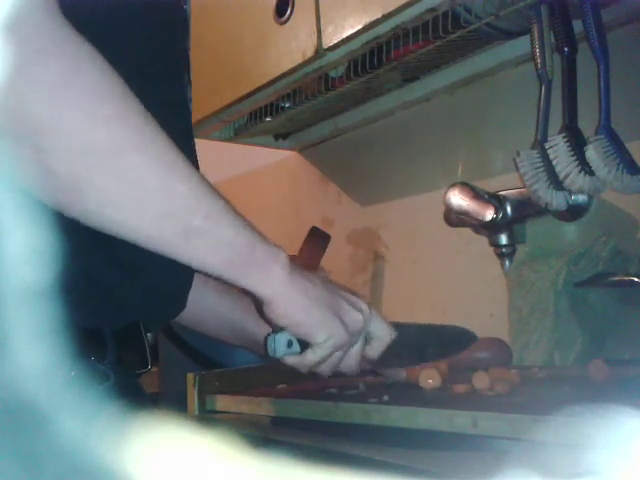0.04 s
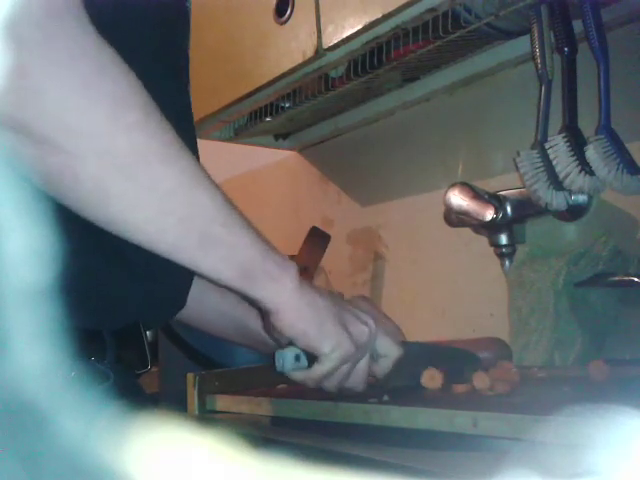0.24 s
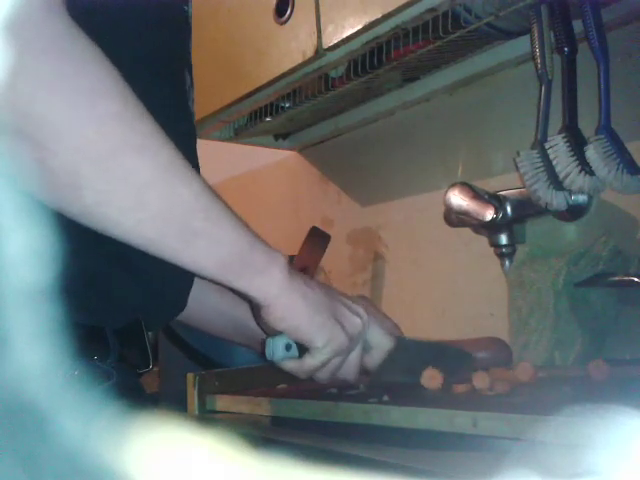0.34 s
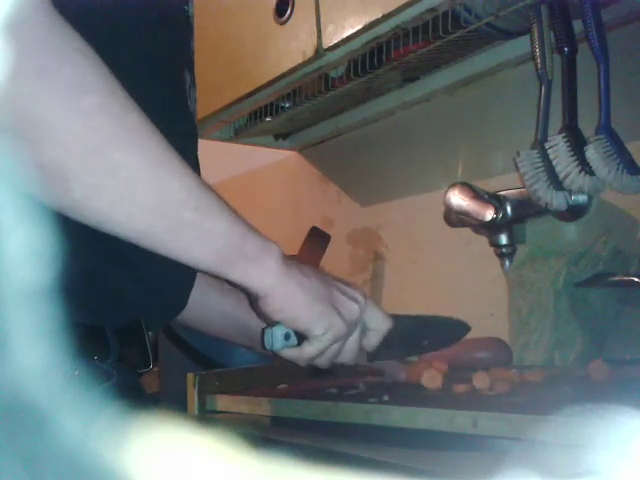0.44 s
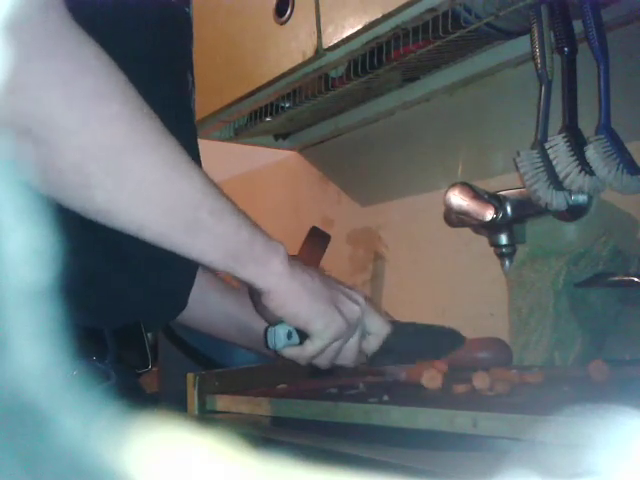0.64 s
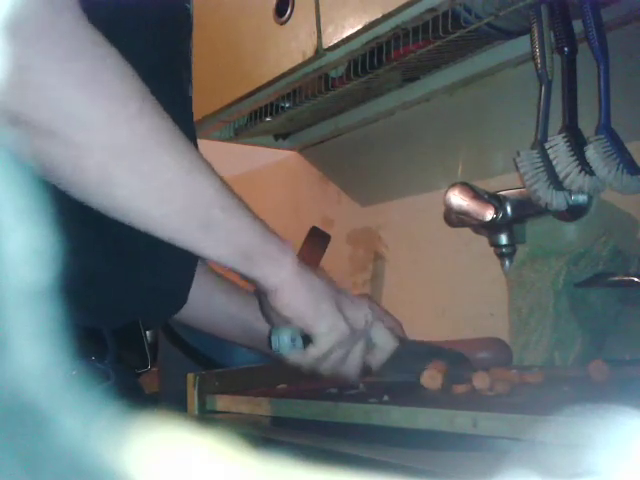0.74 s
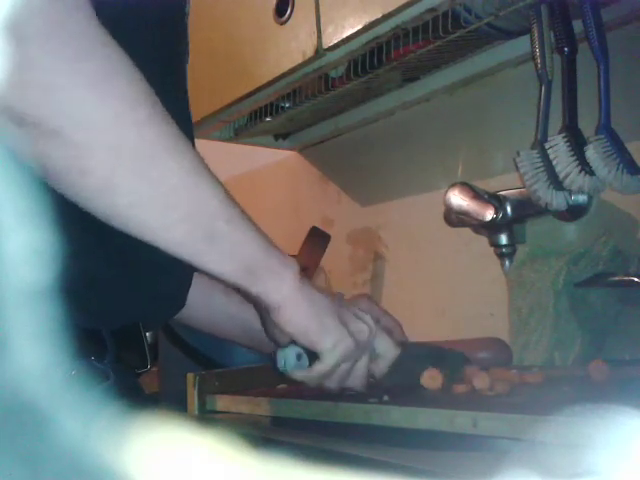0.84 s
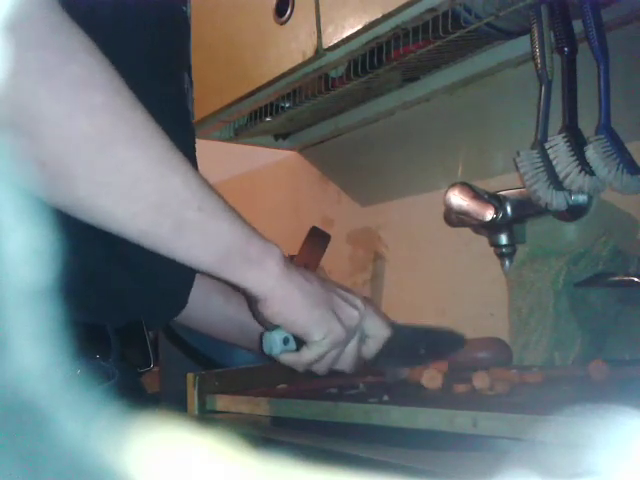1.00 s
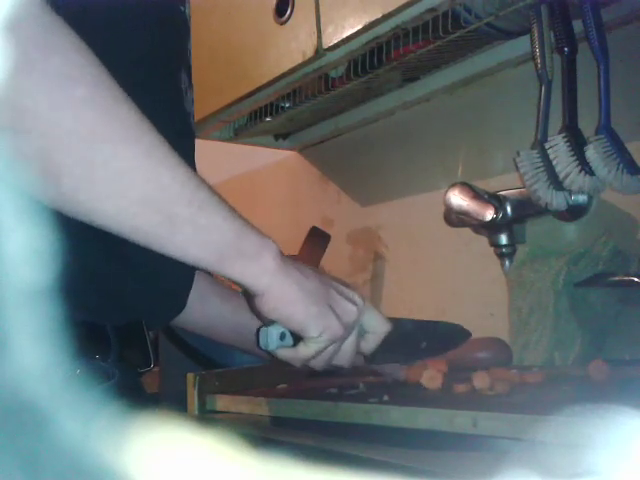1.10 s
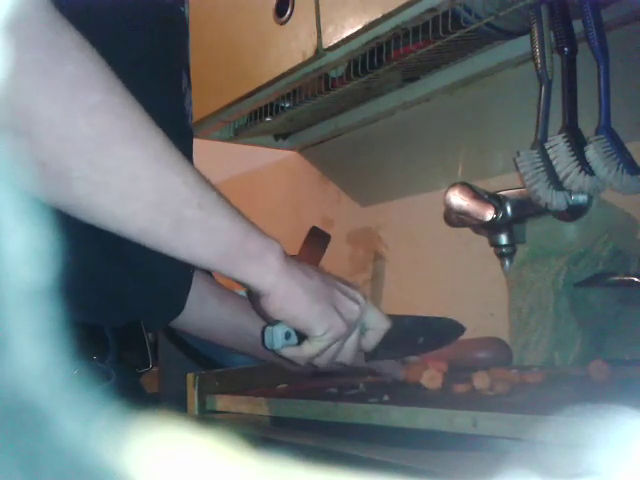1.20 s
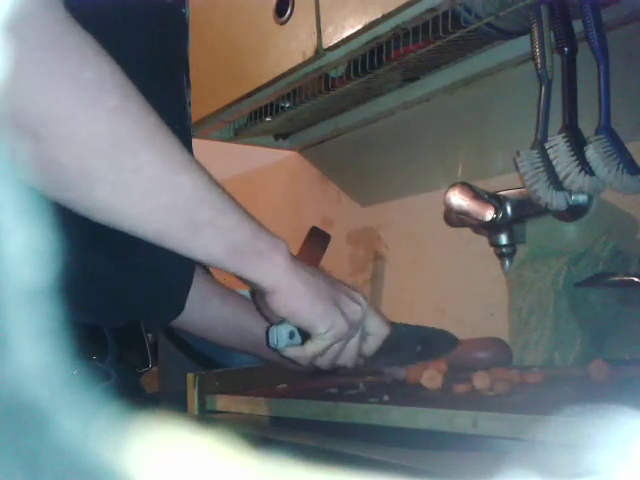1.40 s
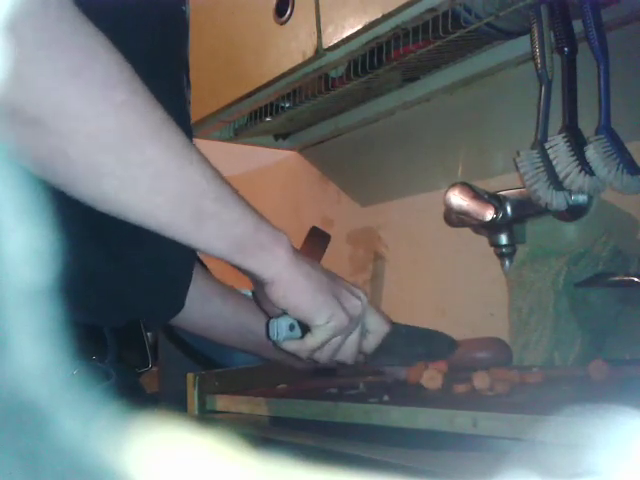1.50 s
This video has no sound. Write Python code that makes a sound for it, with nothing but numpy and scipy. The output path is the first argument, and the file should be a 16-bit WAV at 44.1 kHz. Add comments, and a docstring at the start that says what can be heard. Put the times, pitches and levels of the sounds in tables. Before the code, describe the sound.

A kitchen knife chops a carrot on a wooden board, with sharp knocks at about 0.2 and 0.8 seconds. Each starts with a tiny crisp crunch and leaves a brief ring of steel and worktop in a small kitchen. Soft bumps and nicks come just before each cut. After about 1.1 seconds only faint room hum and hiss remain, with a barely audible touch near 1.5 seconds.

```python
"""A kitchen knife chops carrots on a wooden board in a small, hard-walled kitchen.
For each cut the edge touches the carrot, crunches through its fibres and knocks on the board;
the steel, the worktop and the room ring on. Between cuts the hands shift the carrot with
soft bumps, over a faint bed of room noise, mains hum and hiss."""
import sys
import numpy as np
from scipy import signal
from scipy.fft import rfft, irfft
from scipy.io import wavfile

SR = 44100
rng = np.random.default_rng(int(sys.argv[2]) if len(sys.argv) > 2 else 0)


def master_out(mix):
    """Clip the mix to full scale and print it as 16-bit PCM to the path in sys.argv[1]."""
    frames = np.transpose(np.atleast_2d(mix))
    ceiling = np.clip(frames, -1, 1)
    pcm = np.round(ceiling * 32767).astype(np.int16)
    wavfile.write(sys.argv[1], SR, pcm)


N = 68355
T = np.arange(N) / SR

# The blade lands; the first hit leaves only its tail. Each row: start in seconds, level in dB.
CHOPS = [(-0.29, 8.5), (0.2258, 0.5), (0.8303, 0.34)]
# The board's short, woody knock. Each row: pitch in Hz, level in dB, t60 in seconds.
BOARD_MODES = [(277, -24.5, 0.099), (410, -16, .08), (527, -19, .07), (640.6, -7, 0.034),
               (751, -15.5, 0.033), (823, -16, 0.13), (1095, -17, .1), (1321.4, -15.5, 0.1),
               (1413, -17, 0.075), (1675, -20.5, 0.077), (2007, -17, .08), (2203, -23.5, 0.058),
               (2457, -17, 0.054), (4800, -24, .05)]
# The steel's bright ring. Each row: pitch in Hz, level in dB, t60 in seconds.
BLADE_MODES = [(3070, 0.5, 0.16), (3175, 1, .14), (3520, -2, 0.23), (3814, 3.5, 0.3), (3920, 3, .16),
               (4460, -3, .27), (4430, 5.5, 0.12), (4680, 3.5, 0.064), (6230, -4.5, .09)]
# The worktop and what stands on it, ringing longer. Each row: pitch in Hz, level in dB, t60 in seconds.
WORKTOP_MODES = [(342.7, -24.5, 0.23), (455.3, -7.5, 0.16), (533, -15.5, .23), (585.5, -13.5, 0.24),
                 (686, -19.5, 0.22), (726, -23, .21), (783, -24.5, 0.073), (1133, -24, 0.24),
                 (1319, -22.5, .23), (1487, -26.5, .22), (1753, -28.5, .2), (1880, -19.5, .28),
                 (2170, -33, 0.36)]
# The edge's tick on impact. Each row: frequency in Hz, spectral level in dB.
TICK = [(500, -5.5), (2800, 3), (5000, -4.5), (6500, -6), (8000, -26), (15000, -31)]
# The crack of dense upper modes in wood and blade. Each row: frequency in Hz, spectral level in dB.
CRACK = [(60, -12.5), (250, -7.5), (700, -0.5), (1800, -2.5), (2800, -9.5), (3900, 0.5), (4800, -5),
         (6200, -18), (8000, -32), (15000, -45)]

# The edge splits the carrot, louder as it goes. Each row: start and end in seconds, final level in dB.
SLICES = [(0.202, 0.224, -34.5), (0.803, 0.833, -35.5)]
# The edge nicks the carrot. Each row: peak time in seconds, crunch in dB, width in seconds, board in dB.
NICKS = [(0.105, -60, .008, -62), (0.14, -63, .012, -61), (0.173, -54.5, .012, -51),
         (0.546, -97, .02, -61.5), (0.588, -106, .012, -57.5), (0.6755, -59, .004, -59.5),
         (0.701, -84.5, .02, -63), (0.77, -56, 0.017, -53.5), (0.8201, -37, .005, -54),
         (1.425, -64, .008, -74.5), (1.487, -72.5, .008, -64)]
# The carrot's crisp crunch. Each row: frequency in Hz, spectral level in dB.
CRUNCH = [(300, -14.5), (1200, -11.5), (2300, -10), (3200, 4), (4500, 1), (6500, -5), (9000, -16.5),
          (15000, -13.5)]
# The dull board under the crunch. Each row: frequency in Hz, spectral level in dB.
BOARD_MURMUR = [(100, -13), (330, -6), (620, 3), (850, -11), (1400, -16.5), (2500, -24.5), (8000, -52)]

# Hand and carrot bump the board. Each row: start in seconds, level in dB.
BUMPS = [(0.112, -45.5), (0.18, -52.5), (0.686, -40), (0.742, -48.5), (0.778, -56.5), (1.492, -65)]
# The worktop's low thud. Each row: pitch in Hz, level in dB, t60 in seconds.
BUMP_MODES = [(86, 0, 0.12), (125, 0.5, .08), (190, -5, .07)]

# Slap off the splashback, cupboards and walls. Each row: delay in seconds, level in dB.
REFLECTIONS = [(.0102, -5), (.0185, -8), (.027, -12.5), (.0345, -12)]
# The kitchen's standing waves. Each row: pitch in Hz, level in dB, t60 in seconds.
ROOM_MODES = [(146, -26.5, 0.18), (222.1, -23, .32), (238, -25, .32)]
# The colour of the reverb. Each row: frequency in Hz, spectral level in dB.
ROOM_COLOUR = [(40, -23), (130, -10.5), (300, -4), (550, 3.5), (800, 0), (930, -8), (1100, -3), (2000, -6),
               (2600, -15.5), (3900, -9.5), (5000, -17), (6500, -24.5), (9000, -37), (15000, -45.5)]
# The length of the reverb. Each row: frequency in Hz, t60 in seconds.
ROOM_T60 = [(80, 0.44), (210, .39), (560, 0.3), (1500, 0.34), (3900, 0.32), (10000, 0.22)]

# Low room tone. Each row: frequency in Hz, spectral level in dB.
ROOM_TONE = [(30, -11.5), (95, -3.5), (160, -8.5), (380, -3.5), (800, -16), (1700, -19), (3500, -23),
             (4900, -21.5), (6200, -29), (15000, -31)]
# The slow drift of room tone and hum. Each row: time in seconds, level in dB.
ROOM_TONE_LEVEL = [(0, -68.5), (.55, -68), (.65, -73), (1.1, -67.5), (1.25, -72), (1.4, -75.5),
                   (1.55, -69.5)]
# A thin hiss. Each row: frequency in Hz, spectral level in dB.
HISS = [(1500, -23.5), (3000, -10), (4900, -1), (5600, -13.5), (15000, -27)]
# The slow drift of the hiss. Each row: time in seconds, level in dB.
HISS_LEVEL = [(0, -72), (.15, -70), (.55, -83), (1.0, -79), (1.25, -76.5), (1.4, -80.5), (1.55, -81.5)]


def chops():
    """The blade lands on the same spot each time, so all blows share one knock, ring and tail."""
    tick = from_db(-15) * noise(TICK) * dying(t60=.01)
    crack = from_db(-11.5) * noise(CRACK) * dying(t60=.045)
    blade = from_db(-33) * ring(BLADE_MODES)
    knock = (ring(BOARD_MODES) + blade + crack) * rising(seconds=.0008)
    worktop = ring(WORKTOP_MODES) * rising(seconds=.033)   # swells after the blow
    standing_waves = ring(ROOM_MODES) * rising(seconds=.11)
    room = play(crack, REFLECTIONS) + standing_waves + from_db(-16.5) * room_tail()
    return play(tick + knock + worktop + room, CHOPS)


def carrot(fibres_per_s=9000, spread_db=3, slice_rise_db=22):
    """Fibres snap in dense clicks under the edge; the blade rings along and the board murmurs below."""
    edge, board = np.zeros(N), np.zeros(N)
    for start, end, db in SLICES:
        ramp = np.minimum((T - end) / (end - start), 0)
        push = from_db(db + slice_rise_db * ramp) * (T > start) * (T < end)
        edge += push
        board += push * from_db(-7.5)
    for peak, crunch_db, width, board_db in NICKS:
        age = (T - peak) / width
        touch = np.exp(np.minimum(age, 0) / .4 - np.maximum(age, 0) ** 2 / 2)   # quick in, rounded out
        edge += from_db(crunch_db) * touch
        board += from_db(board_db) * touch
    snaps = (rng.random(N) < fibres_per_s / SR) * rng.choice([-1, 1], N)
    snaps = snaps * from_db(spread_db * np.minimum(rng.exponential(1, N), 4))
    crunch = edge * coloured(snaps, CRUNCH) + board * coloured(snaps, BOARD_MURMUR)
    gripped_steel = ring(BLADE_MODES) * dying(t60=.09)   # the carrot damps the blade
    blade = from_db(-3) * through(edge * snaps, gripped_steel)
    walls = from_db(-5) * through(crunch, rng.standard_normal(N) * dying(t60=.16))
    return crunch + blade + walls


def bumps():
    """Soft pushes wake only the lowest modes of the worktop."""
    return play(ring(BUMP_MODES) * rising(seconds=.013), BUMPS)


def room_tail(band_count=20):
    """The kitchen's diffuse reverb: each band of a noise dies at its own rate."""
    hz = np.fft.rfftfreq(N, 1 / SR)
    spectrum = rfft(noise(ROOM_COLOUR))
    edges = np.geomspace(25, 18000, band_count + 1)
    tail = np.zeros(N)
    for lo, hi in zip(edges, edges[1:]):
        band = irfft(spectrum * ((hz >= lo) & (hz < hi)), N)
        tail += band * dying(at_hz(ROOM_T60, np.sqrt(lo * hi)))
    return tail * rising(seconds=.0085)


def background(hum_hz=100, hum_db=-2.5):
    """Room tone, mains hum and a faint hiss, all wavering slowly in level."""
    hiss = fader(HISS_LEVEL) * noise(HISS)
    hum = from_db(hum_db) * np.sin(2 * np.pi * hum_hz * T)
    return fader(ROOM_TONE_LEVEL) * (noise(ROOM_TONE) + hum) + hiss


def from_db(db):
    """Decibels to gain."""
    return 10 ** (np.asarray(db) / 20)


def fader(points):
    """Gain that rides through (seconds, dB) points."""
    return from_db(np.interp(T, *np.transpose(points)))


def at_hz(points, hz):
    """Read a table on a log-frequency axis."""
    f, value = np.transpose(points)
    return np.interp(np.log(np.maximum(hz, 1)), np.log(f), value)


def dying(t60):
    """Decay that loses 60 dB in t60 seconds."""
    return np.exp(-np.log(1000) * T / t60)


def rising(seconds):
    """Attack that opens with the given time constant."""
    return 1 - np.exp(-T / seconds)


def coloured(x, spectrum):
    """EQ a steady signal and bring it to unit rms."""
    gain = from_db(at_hz(spectrum, np.fft.rfftfreq(N, 1 / SR)))
    shaped = irfft(rfft(x) * gain, N)
    return shaped / np.sqrt(np.mean(shaped ** 2) + 1e-20)


def noise(spectrum):
    """Steady coloured noise at unit rms."""
    return coloured(rng.standard_normal(N), spectrum)


def ring(modes):
    """Struck modes as dying sines of alternating sign."""
    return sum((-1) ** k * from_db(db) * dying(t60) * np.sin(2 * np.pi * hz * T)
               for k, (hz, db, t60) in enumerate(modes))


def play(sound, events):
    """Trigger one sound at every (seconds, dB) event."""
    samples = np.arange(N)
    return sum(from_db(db) * np.interp(samples - round(start * SR), samples, sound, left=0, right=0)
               for start, db in events)


def through(x, response):
    """Pass a sound through a response scaled to unit energy."""
    return signal.fftconvolve(x, response / np.linalg.norm(response))[:N]


def scene():
    """Knife, carrot, hands and background, mixed in mono."""
    return (chops() + carrot() + bumps() + background())[None]


def record(dry, ceiling=.7, cutoff_hz=15100):
    """Soft-clip the highest peaks and cut the very top."""
    rounded = dry / (1 + (dry / ceiling) ** 6) ** (1 / 6)
    lowpass = signal.ellip(10, .1, 80, cutoff_hz, fs=SR, output="sos")
    return signal.sosfilt(lowpass, rounded)


dry = scene()
out = record(dry)
master_out(out)
```